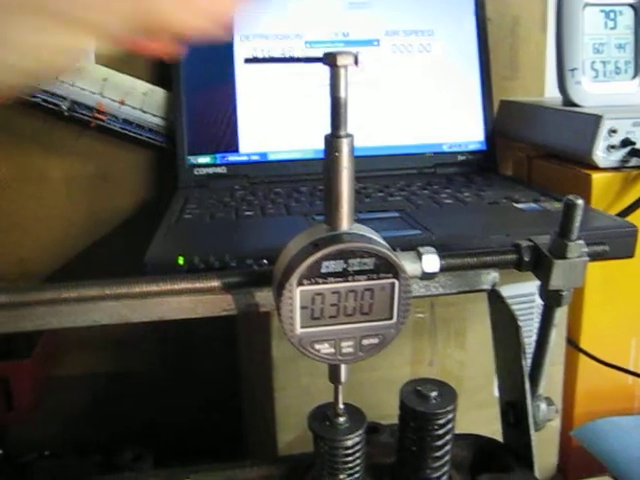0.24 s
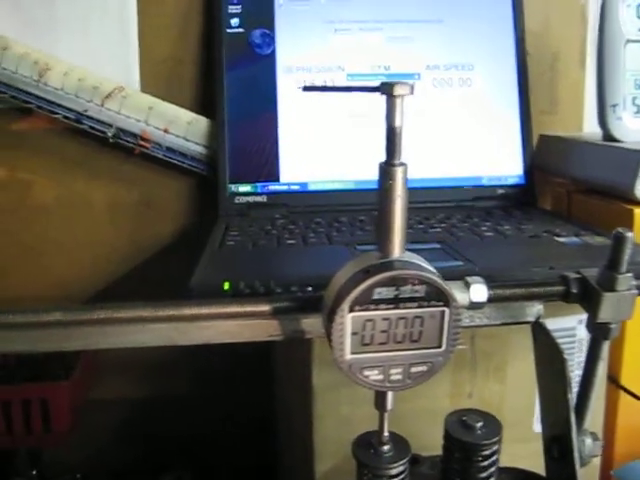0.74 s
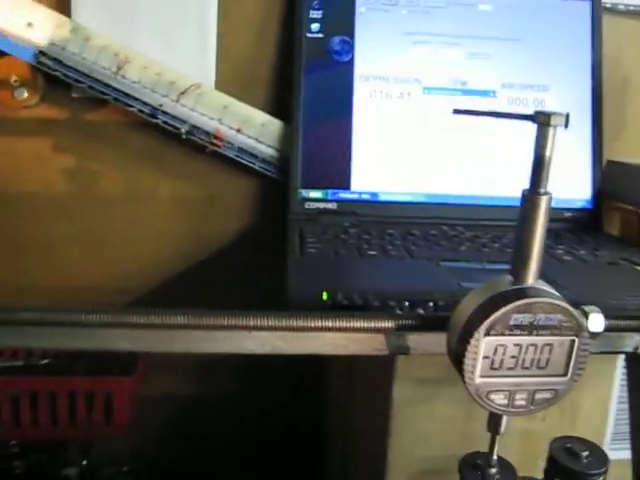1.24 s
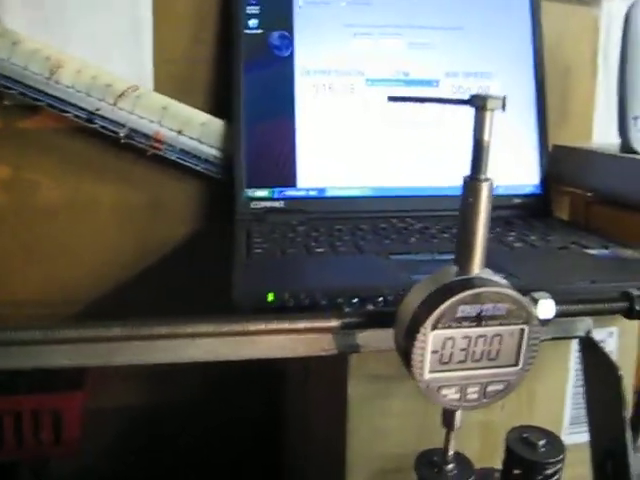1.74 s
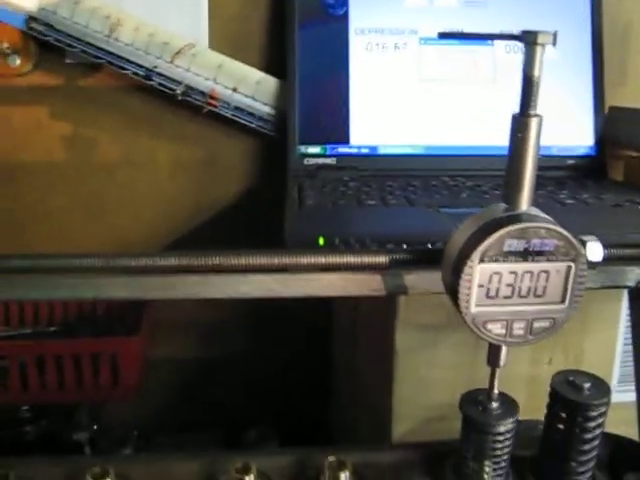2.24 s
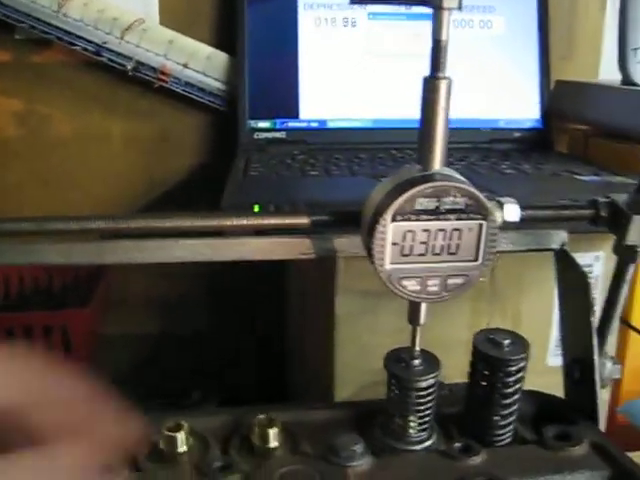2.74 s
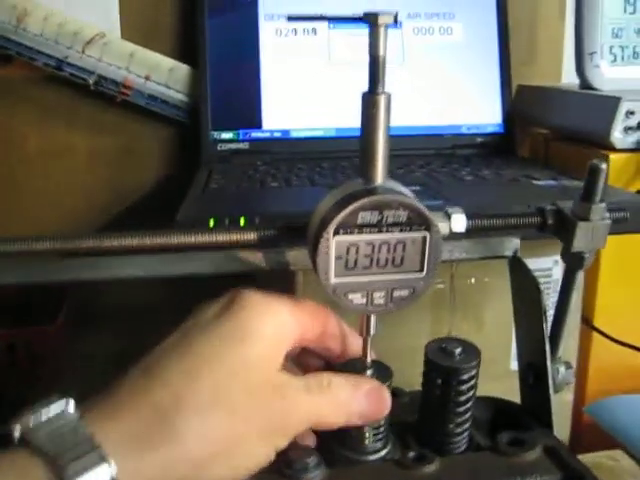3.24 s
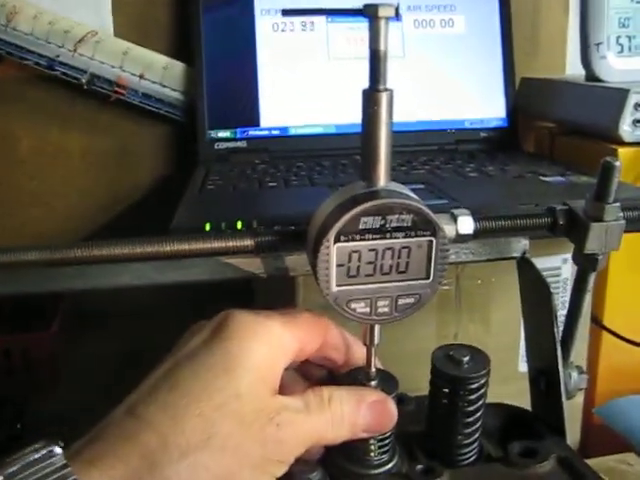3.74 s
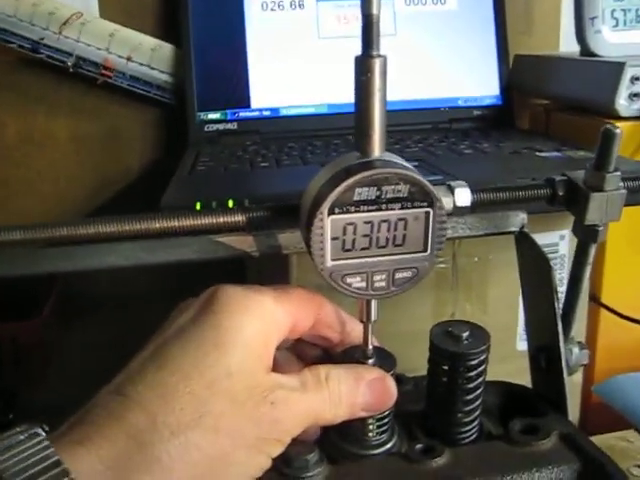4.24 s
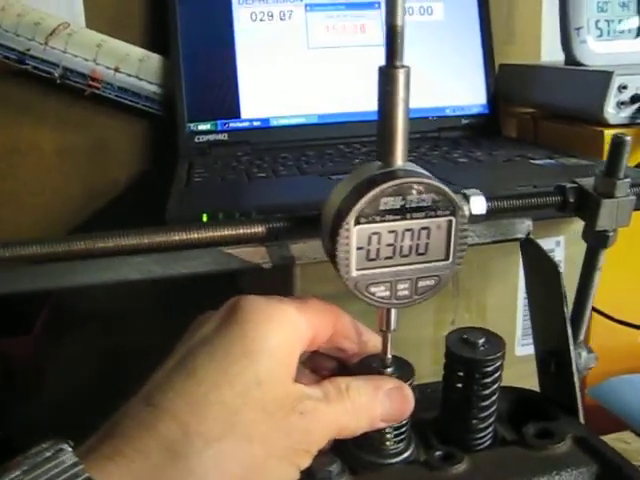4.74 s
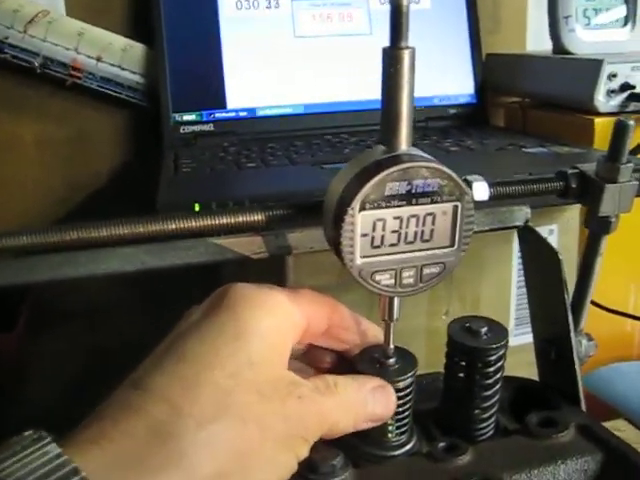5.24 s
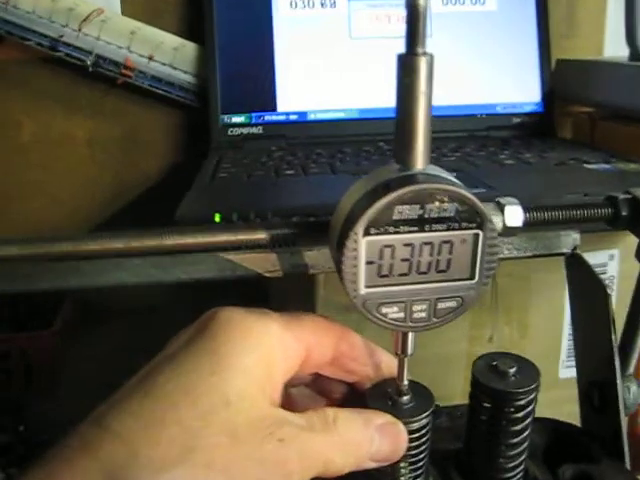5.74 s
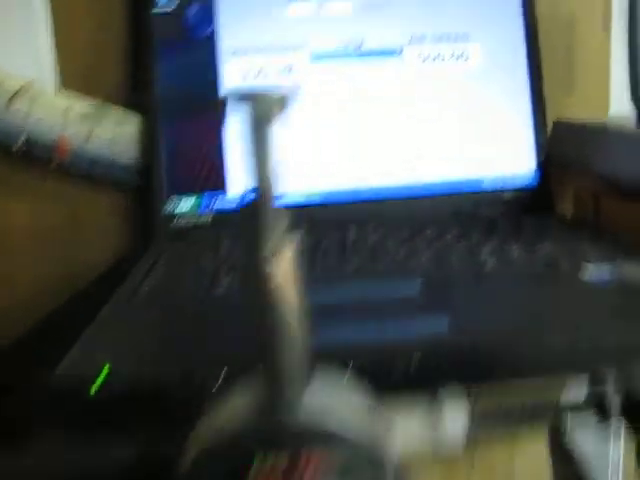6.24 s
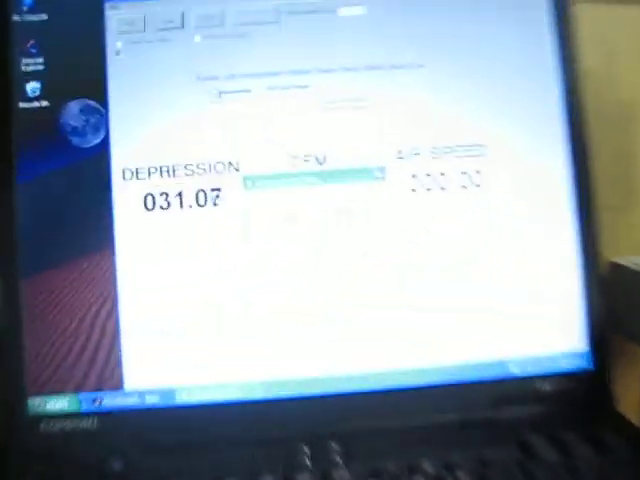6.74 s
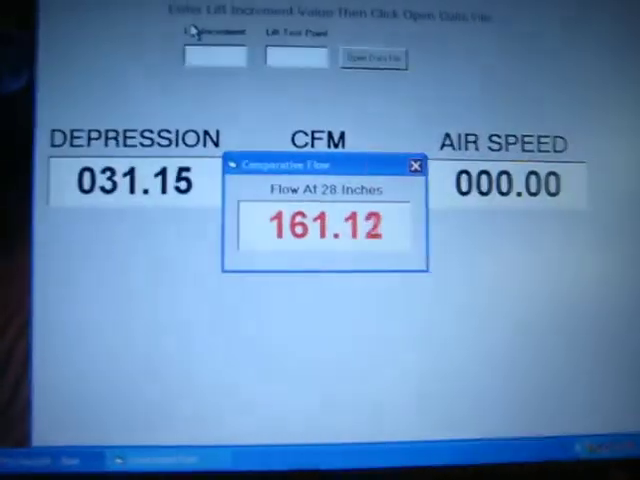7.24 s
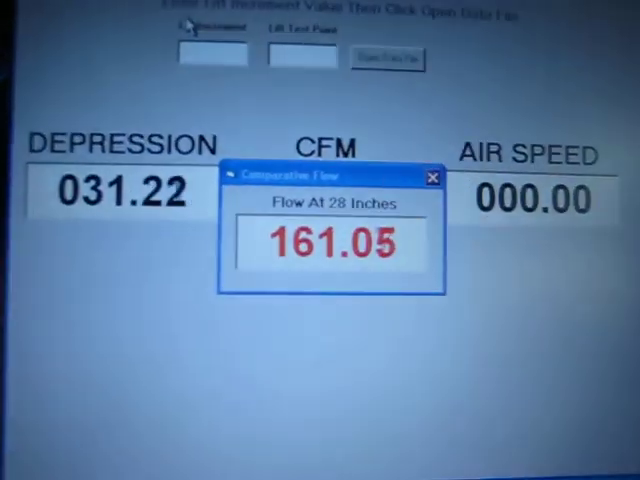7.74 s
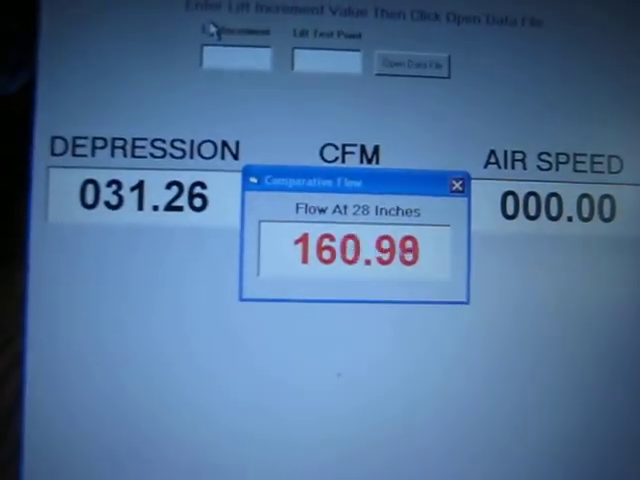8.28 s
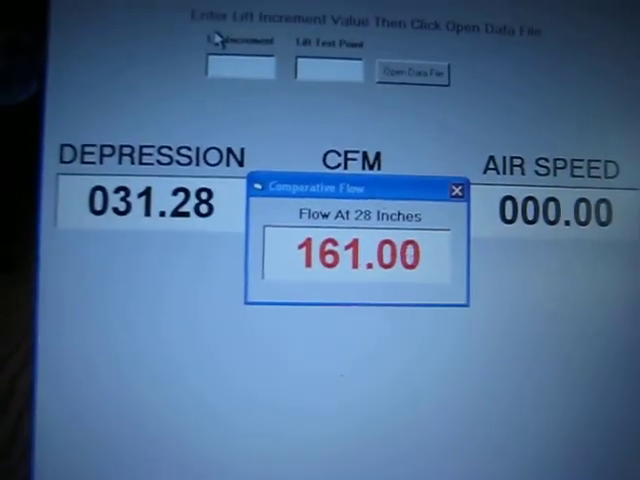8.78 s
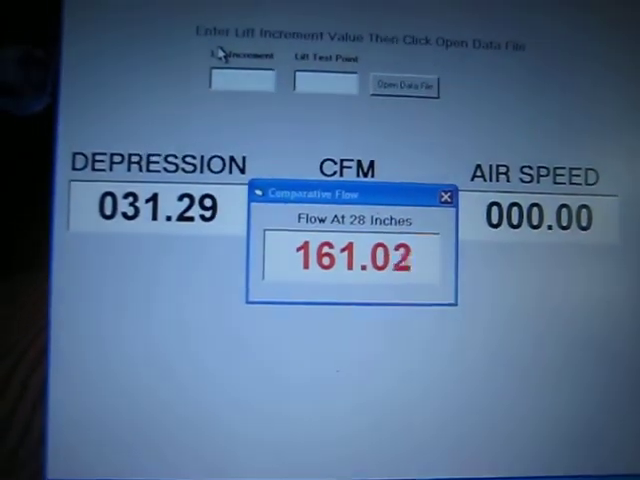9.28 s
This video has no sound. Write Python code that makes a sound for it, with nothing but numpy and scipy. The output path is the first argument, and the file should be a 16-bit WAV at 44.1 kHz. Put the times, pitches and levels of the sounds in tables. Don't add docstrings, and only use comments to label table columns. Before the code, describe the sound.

Steady broadband air rush with electric motor hum and thin blade whine; more motors spin up near two seconds, then everything brightens and grows louder.

```python
import sys
import numpy as np
from scipy import signal
from scipy.fft import rfft, irfft
from scipy.io import wavfile
from scipy.ndimage import uniform_filter1d

SR = 44100
rng = np.random.default_rng(int(sys.argv[2]) if len(sys.argv) > 2 else 0)


def generate_wav(sig):
    pcm = np.round(np.clip(np.atleast_2d(sig).T, -1, 1) * 32767).astype(np.int16)
    wavfile.write(sys.argv[1], SR, pcm)


def volts_from_decibels(level):
    exponent = np.asarray(level, float) / 20
    return 10 ** exponent


N = 419391
WINDOW = 2048

# (time [s], place, rush level [dB])
CAMERA = [(0, -1.16, 0), (.95, -.5, .5), (1.25, -0.21, .5), (1.85, 0.021, 0.5), (2.1, 0.16, 1),
          (2.35, 0.45, 1), (2.7, 0.72, .5), (3.1, .95, 0), (4.2, 0.96, 0), (4.8, 1.1, 0.45), (5.9, 1.1, 0),
          (6.2, 1.38, 0.4), (6.5, 1.63, 0.9), (6.7, 1.78, 0.9), (7.1, 1.94, 0), (7.5, 2, 0), (9, 1.95, 0.5),
          (9.51, 2, -.5)]
# (speed before [Hz], shift starts [s], shift ends [s], speed then [Hz], final speed [Hz])
MOTORS = [
    (434.3, 1.79, 1.88, 437.3, 447.9),
    (405.4, 1.7, 1.96, 398, 415.9),
    (150, 1.8, 1.9, 168, 399),
    (150, 2.2, 2.3, 170, 258.9),
]


def columns(table, t):
    s, *rest = np.transpose(table)
    return np.array([np.interp(t, s, c) for c in rest])


def walk(shape, steps):
    k = max(int(steps), 1)
    v = rng.standard_normal(shape)
    for _ in range(2):
        v = uniform_filter1d(v, k, mode="wrap")
    return v / v.std()


def hump(f, hz, width):
    return np.exp(-.5 * ((f - hz) / (.5 * width)) ** 2)


def shaft_speeds(t):
    settle_s = (1.0, .6, .25, 1.18)
    hold_s = (.12, .11, 0, 0)
    hz = []
    for (old, start, end, new, final), tau, hold in zip(MOTORS, settle_s, hold_s):
        climb = 1 - np.exp(-np.maximum(t - end - hold, 0) / tau)
        hz.append(np.interp(t, [start, end], [old, new]) + (final - new) * climb)
    hz = np.array(hz)
    late = np.maximum(t - MOTORS[2][2], 0)
    hz[2] += 12 * (np.exp(-late / settle_s[2]) - np.exp(-late / 1.6))
    hz[0] += np.interp(t, (.55, 1.0), [1.3, 0]) - .2 * np.maximum(t - 6.8, 0)
    return hz


def blade_whine(t):
    base_db = (-56, -48, -54)
    # (time [s], length [s], level [dB])
    crests = [
        [(.15, 0.88, -30.5), (.95, 0.34, -34.5), (1.42, 0.48, -32), (1.92, 0.18, -30.5), (2.12, .32, -35),
         (4.6, .7, -42), (5.6, .9, -43), (6.67, 0.38, -33.5), (7.22, .2, -34), (7.7, .5, -44), (8.4, .7, -43),
         (9.55, .4, -38)],
        [(0, .3, -45), (.8, .45, -45), (1.65, .5, -40), (2.2, .3, -37), (5.8, 0.66, -39.5), (6.45, .35, -39),
         (7.0, .3, -46), (7.65, 0.97, -36.5), (8.8, 1.1, -39)],
        [(3.9, .7, -40), (5.2, .4, -46.5), (6.8, 0.42, -38), (7.35, .5, -43.5), (9.4, 1.2, -45)],
    ]
    whine = []
    for base, rows in zip(base_db, crests):
        power = volts_from_decibels(2 * base)
        for s, length, db in rows:
            power = power + volts_from_decibels(2 * db) * hump(t, s, length) ** 2
        whine.append(np.sqrt(power))
    whine[2] = whine[2] * (t > 2.8)
    return whine


def motors():
    # (place, motor 1 [dB], motor 2 [dB], motor 3 [dB], motor 4 [dB], mains hum [dB])
    shafts = [
        (-1.2, -42.5, -36, -48, -64, -59),
        (0, -34.5, -33, -40, -64, -57),
        (0.2, -41, -35, -43, -64, -57),
        (0.87, -49.5, -41.5, -46, -61, -63.5),
        (1.15, -48.5, -44, -46.5, -62, -62.7),
        (1.42, -36.5, -39.5, -43, -69, -58.5),
        (1.78, -26.5, -36, -36.5, -65, -53),
        (2, -25, -33, -35, -49, -50),
    ]
    # (motor index, multiple, level under shaft tone [dB])
    overtones = [
        (0, 3, -21),
        (2, 2, -8),
        (3, 2, -9),
    ]
    blades = (8, 6, 6)

    t = np.arange(N) / SR
    hz = uniform_filter1d(shaft_speeds(t), 4000, axis=1)
    turns = 2 * np.pi * np.cumsum(hz, axis=1) / SR
    turns = turns + 2 * np.pi * rng.random((4, 1)) + .025 * walk((4, N), SR / 12)
    *shaft_db, hum_db = columns(shafts, columns(CAMERA, t)[0])
    for m, start_s, fade_s in ((2, 1.93, .05), (3, 2.8, .3)):
        unbalance = (hz[m] / MOTORS[m][4]) ** 2
        fade = np.clip((t - start_s) / fade_s, .01, 1)
        swallowed_db = -11 * hump(hz[m], 322, 55)
        shaft_db[m] = shaft_db[m] + swallowed_db + 20 * np.log10(unbalance * fade)

    out = np.zeros(N)
    for phase, db in zip(turns, shaft_db):
        out += volts_from_decibels(db + .3 * walk(N, SR / 8)) * np.sin(phase)
    for m, multiple, db in overtones:
        out += volts_from_decibels(shaft_db[m] + db + 1.5 * walk(N, SR / 6)) * np.sin(multiple * turns[m])
    for phase, count, gain in zip(turns, blades, blade_whine(t)):
        out += gain * volts_from_decibels(1.5 + 1.2 * walk(N, SR / 30)) * np.sin(count * phase)
    hum_db = hum_db - 3.5 * np.clip((t - 1.92) / .1 + .5, 0, 1)
    mains_hz = 120
    return np.sqrt(2) * (out + volts_from_decibels(hum_db) * np.sin(2 * np.pi * mains_hz * t))


def fan():
    # (place, shaft tone [dB], second harmonic [dB])
    fan_path = [
        (-1, -63, -60.5),
        (0, -63.5, -58.5),
        (.4, -80, -66),
        (1.2, -82, -66),
        (1.6, -76, -60),
        (2, -72, -50),
    ]
    t = np.arange(N) / SR
    hz = np.interp(t, MOTORS[0][1:3], (160, 163.4))
    turns = 2 * np.pi * np.cumsum(hz) / SR + 0.27 * walk(N, SR / 6)
    low_db, high_db = columns(fan_path, columns(CAMERA, t)[0])
    low = volts_from_decibels(low_db) * np.sin(turns)
    octave = volts_from_decibels(high_db + 3 * walk(N, SR / 4)) * np.sin(2 * turns)
    return np.sqrt(2) * (low + octave)


def place_colour(f, near):
    # (frequency [Hz], beside the bench [dB per Hz], over the head [dB per Hz], at the laptop [dB per Hz])
    air_floor = [(25.0, -89.9, -95, -80), (60.0, -89.7, -92.2, -79.5), (150.0, -81, -85.8, -71),
                 (304, -75.5, -78.5, -69), (515, -71.5, -76, -65), (750, -68.5, -69.5, -68),
                 (1120, -62, -65, -58.5), (1640, -64.5, -63, -61.5), (3070, -61, -62, -59),
                 (5900.0, -68, -66.5, -63.5), (9470, -74, -69.5, -72.5), (13600, -78.5, -73, -79.5),
                 (14500.0, -84, -77, -82), (15700.0, -92, -90, -88.2)]
    # (frequency [Hz], width [Hz], level [dB])
    beside = [(162, 15, 3), (355, 30, 5.5), (686, 22, 4.5), (918, 190, 8), (1816, 164, 12), (2006, 84, 9),
              (2320, 440, 6.5), (2800, 300, 6), (1630, 55, -2), (3800, 350, 7), (4820, 630, 7),
              (5350, 140, 6.5), (6640, 650, 4), (7630, 900, 4), (8970, 300, 4), (11100, 500, 3)]
    # (frequency [Hz], width [Hz], level [dB])
    over = [(446, 37, 15), (910, 78, 6), (1110, 60, 5), (1827, 410, 6.5), (1604, 95, -8.5),
            (2416, 410, 6.5), (2800, 240, 5.5), (3705, 290, 6), (4010, 370, 2.5), (4715, 630, 8.5),
            (5210, 270, 6), (6000, 200, -4.5), (6720, 710, 4.5), (7940, 1250, 3.5), (8940, 400, 2.5),
            (10700, 630, 3.5)]
    # (frequency [Hz], width [Hz], level [dB])
    laptop = [(329, 15, 7), (351, 29, 11), (434, 14, 14.5), (440, 10, 0), (454, 10, 4), (542, 43, 6.5),
              (870, 210, 5.5), (1330, 71, 2), (1716, 41, 10), (1900, 89, 9.5), (2260, 35, 6),
              (2535, 61, 3.5), (2730, 31, 7.5), (3010, 40, 7), (3110, 40, 2), (2200, 54, -1),
              (3830, 130, -3.5), (4240, 300, -1.5), (4520, 62, 6), (4620, 50, -1.5), (5000, 50, 1),
              (5360, 140, 1.5)]
    hz, *floors = np.transpose(air_floor)
    db = 0
    for here, floor, modes in zip(near, floors, (beside, over, laptop)):
        colour = np.interp(np.log(f + 1), np.log(hz), floor)
        for mode_hz, width, top_db in modes:
            colour = colour + top_db * hump(f, mode_hz, width)
        db = db + here * colour
    return db


def camera_tilt(f, place):
    path_bass_db = (-.5, -1, -2)
    path_treble_db = (1, 0.1, 0.55)
    turn = hump(place, 1.715, 0.22)
    bass_db = np.interp(place, np.arange(3), path_bass_db) - 1.5 * turn
    treble_db = np.interp(place, np.arange(3), path_treble_db) - 4.5 * turn
    return bass_db / (1 + (f / 700) ** 4) + treble_db / (1 + (6500 / (f + 1)) ** 4)


def sliding_waves(f, t):
    # (time [s], length [s], frequency [Hz], glide [Hz per s], level [dB])
    slides = [(6.87, 0.64, 820, 270, 6), (6.6, 1.0, 2090, 500, 3.5), (6.69, 0.57, 2570, 350, -8.5),
              (6.2, .5, 4020, 200, -5.5), (7.25, .15, 3950, 100, 5), (5.8, .5, 4650, -800, 1),
              (6.62, 0.18, 4570, 600, 7), (7.0, 0.13, 4640, -400, 7.5), (7.5, 0.27, 4800, 400, 5.5),
              (6.48, .35, 5820, -200, 6.5), (6.42, .35, 6060, -200, 3), (6.0, .15, 7250, -1000, -3),
              (6.4, 0.19, 6700, -1200, 2), (7.3, 0.36, 7300, 1600, 4)]
    db = 0
    for s, length, hz, glide, top_db in slides:
        width = 120 + 0.059 * hz
        db = db + top_db * hump(t, s, length) * hump(f, hz + glide * (t - s), width)
    return db


def screen_gap(f, t):
    # (time [s], frequency [Hz], level [dB])
    gap = [
        (6.7, 2800, -1),
        (7.05, 3120, 1.5),
        (7.5, 3400, 6.5),
        (7.8, 3530, 4),
        (8.2, 3620, 4.5),
        (8.7, 3560, 1.5),
        (9.1, 3440, 6),
        (9.51, 3400, 4),
    ]
    gap_modes = [
        (.86, 0.12, -0.9),
        (1, 0.075, 1),
        (1.7, 0.04, .5),
        (2.43, 0.049, 0.06),
    ]
    gap_hz, gap_db = columns(gap, t)
    shape = sum(share * hump(f, m * gap_hz, w * m * gap_hz) for m, w, share in gap_modes)
    return gap_db * (t > gap[0][0]) * shape


def reflections(f, place, near, rate):
    # (beside [ms], over [ms], at the laptop [ms], gain)
    echoes = [
        (5.7, 6.1, 4.1, 0.062),
        (3.8, 2.9, 6.7, 0.077),
        (12, 7.5, 8.3, 0.13),
        (13.5, 12.1, 11.7, 0.087),
    ]
    sway = 1 + 0.0043 * walk((len(echoes), len(place)), rate / 1.9)
    hard = 1 + 0.5 * near[2]
    room = 1
    for (*delays_ms, gain), s in zip(echoes, sway):
        delay_s = np.interp(place, np.arange(3), delays_ms) * s / 1000
        room = room + hard * gain * np.exp(-2j * np.pi * f * delay_s)
    return room


def rush():
    overlap = WINDOW * 3 // 4
    f, t, noise = signal.stft(rng.standard_normal(N), SR, nperseg=WINDOW, noverlap=overlap)
    f, rate = f[:, None], 4 * SR / WINDOW
    place, rush_db = columns(CAMERA, t)
    place = np.clip(place, 0, 2)
    near = np.clip(1 - abs(place - np.arange(3)[:, None]), 0, 1)
    db = rush_db + camera_tilt(f, place) + place_colour(f, near)
    db = db + screen_gap(f, t) + sliding_waves(f, t)
    db = db + (.1 + .35 * f / 10000) * walk(len(t), rate / 25)
    patches = uniform_filter1d(walk(noise.shape, rate / 5), size=9, axis=0)
    db = db + 0.6 * patches / patches.std()
    shaped = noise * volts_from_decibels(db) * reflections(f, place, near, rate) * (f < 15710)
    air = signal.istft(shaped * np.sqrt(SR / 2), SR, nperseg=WINDOW, noverlap=overlap)[1][:N]
    return air * volts_from_decibels(0.4 * walk(N, SR / 90))


def scene():
    mono = motors() + fan() + rush()
    return np.array([mono, mono])


def splits(mono):
    # (time [s], low edge [Hz], high edge [Hz])
    split_bands = [(1.377, 5000, 7060), (1.377, 9470, 11200), (1.377, 12400, 13950), (1.608, 10160, 11890),
                   (1.956, 10850, 13090), (2.514, 10850, 12580), (2.908, 4480, 7060), (2.955, 5000, 7060),
                   (2.955, 12230, 13950), (3.094, 6030, 7750), (3.094, 9470, 11200), (4.023, 6720, 9820),
                   (4.023, 12230, 13950), (4.232, 11540, 13260), (5.416, 6720, 8440), (6.229, 3960, 5860),
                   (7.715, 8100, 9820), (8.11, 7410, 9130), (8.39, 7410, 9130), (8.39, 14300, 15850),
                   (8.807, 3960, 5340), (8.807, 13780, 15160), (9.086, 3960, 5340), (9.086, 6720, 8440),
                   (9.086, 10850, 12580), (9.086, 13090, 15850), (9.225, 5510, 9130), (9.225, 11540, 13260),
                   (9.457, 5510, 7060), (9.457, 10850, 15850)]
    side, f = np.zeros(N + WINDOW), np.arange(WINDOW // 2 + 1) * SR / WINDOW
    window = signal.windows.kaiser_bessel_derived(WINDOW, 4 * np.pi)
    for s, low_hz, high_hz in split_bands:
        band = (f > low_hz + 200) * (f < min(high_hz - 170, 15650))
        i = 179 + round((s * SR - 179) / 1024) * 1024
        heard = irfft(rfft(mono[i:i + WINDOW], WINDOW) * band)
        burst = irfft(rfft(rng.standard_normal(WINDOW)) * band)
        side[i:i + WINDOW] += burst / burst.std() * heard.std() * volts_from_decibels(-3) * window
    return side[:N] * np.array([[1], [-1]])


def top_cut(x):
    return signal.sosfilt(signal.butter(12, 15730, fs=SR, output="sos"), x)


def record(dry):
    mix = dry + splits(dry[0])
    return top_cut(mix)


dry = scene()
out = record(dry)
generate_wav(out)
```